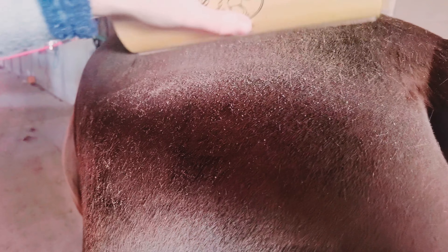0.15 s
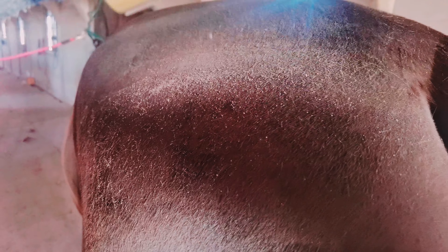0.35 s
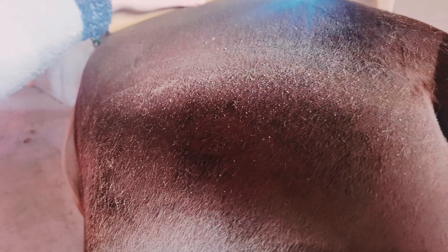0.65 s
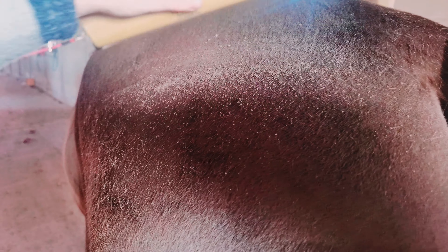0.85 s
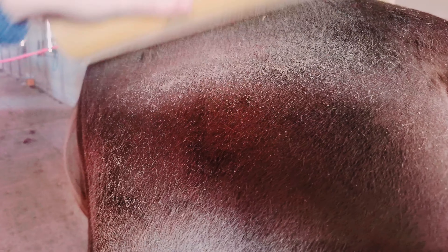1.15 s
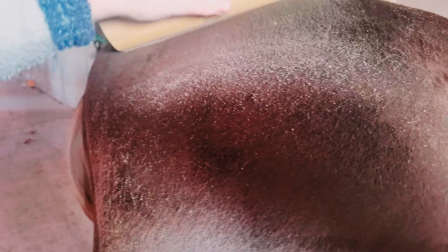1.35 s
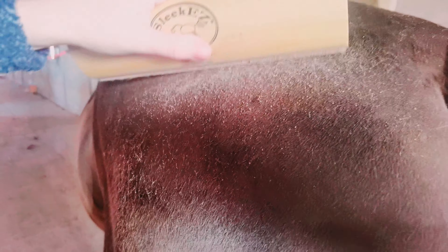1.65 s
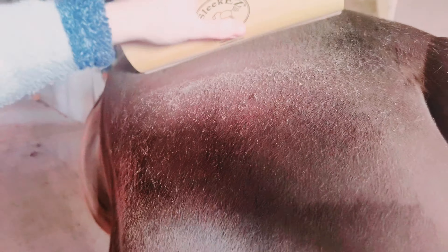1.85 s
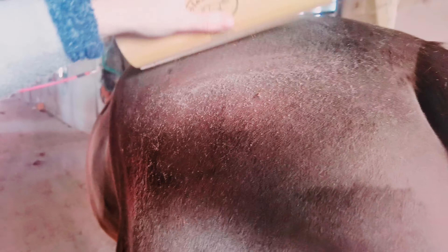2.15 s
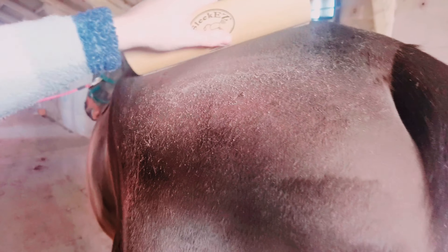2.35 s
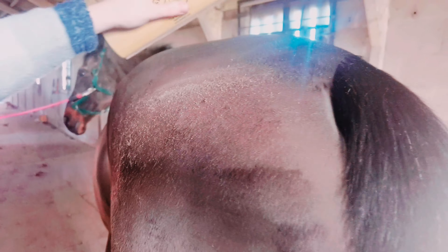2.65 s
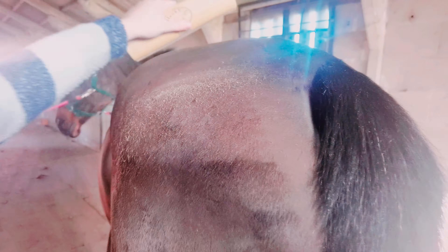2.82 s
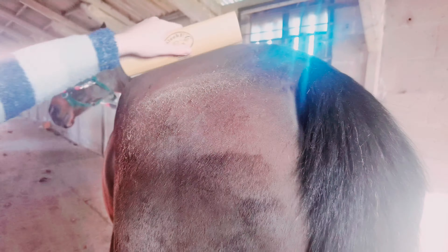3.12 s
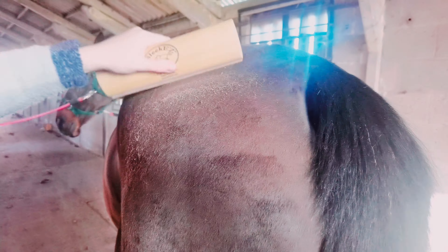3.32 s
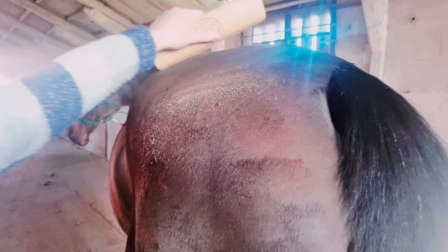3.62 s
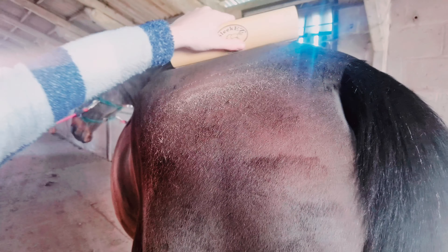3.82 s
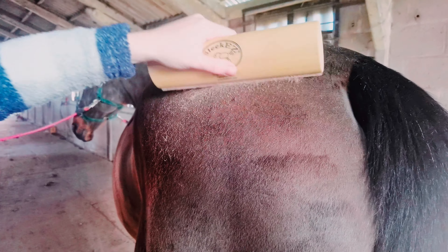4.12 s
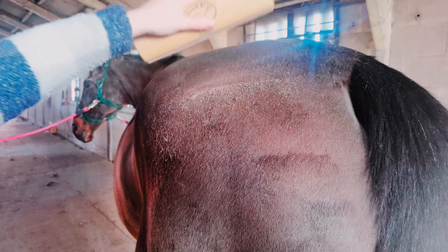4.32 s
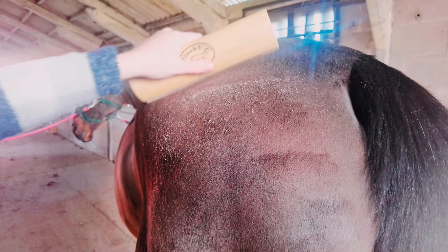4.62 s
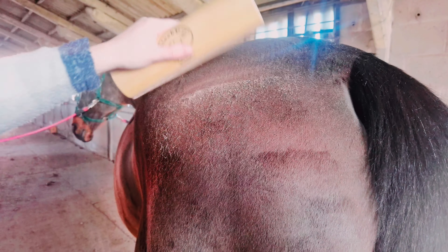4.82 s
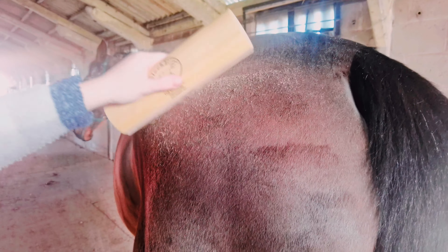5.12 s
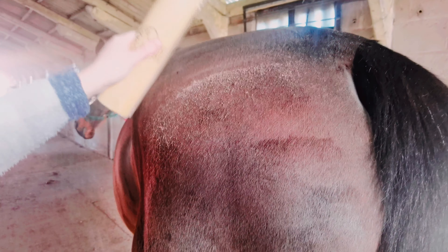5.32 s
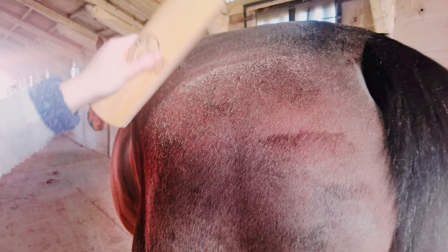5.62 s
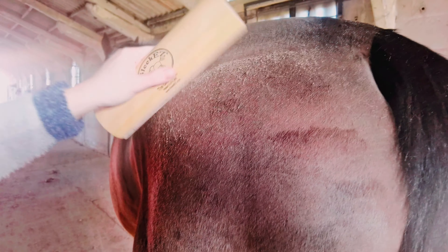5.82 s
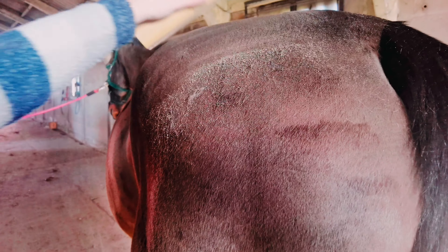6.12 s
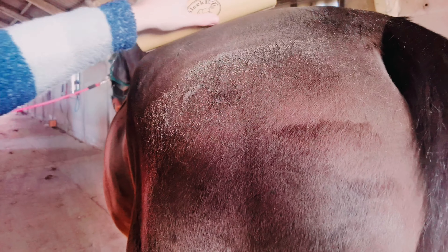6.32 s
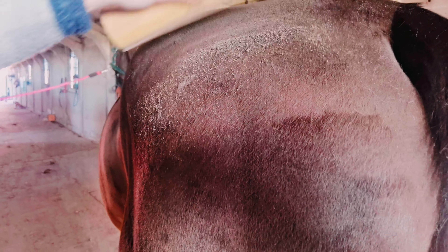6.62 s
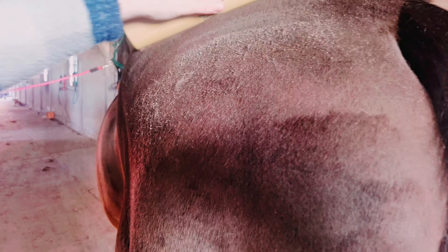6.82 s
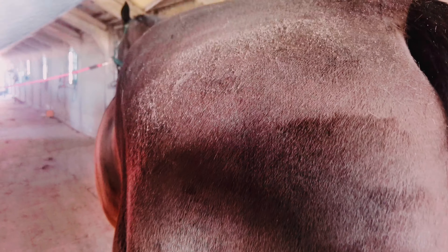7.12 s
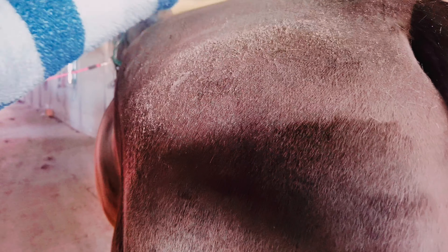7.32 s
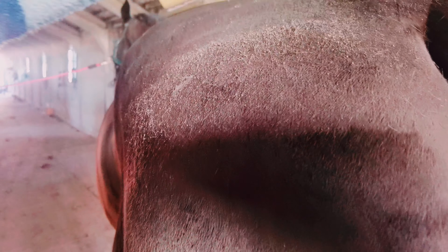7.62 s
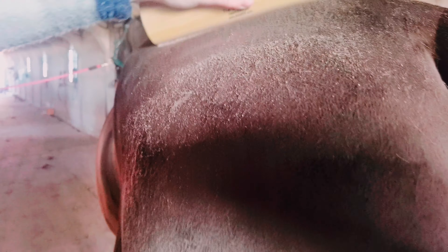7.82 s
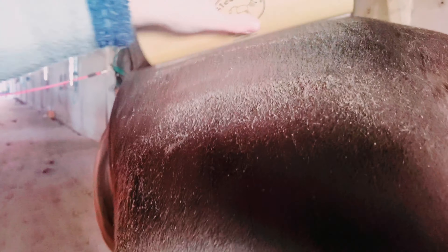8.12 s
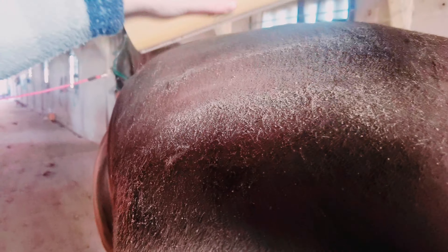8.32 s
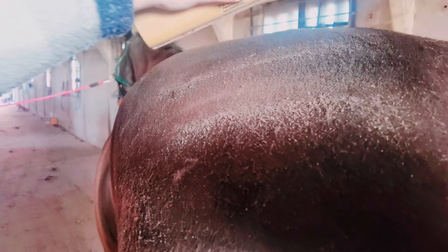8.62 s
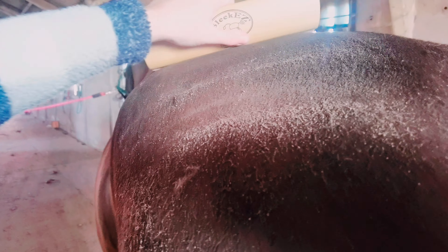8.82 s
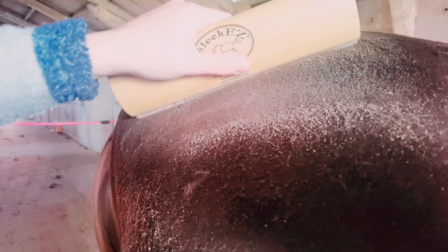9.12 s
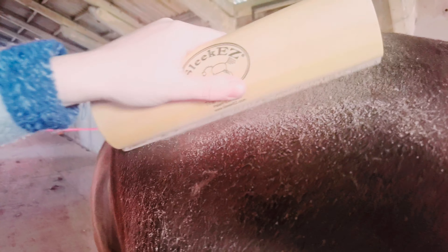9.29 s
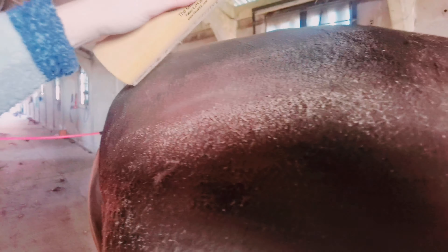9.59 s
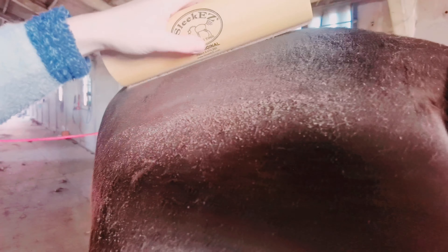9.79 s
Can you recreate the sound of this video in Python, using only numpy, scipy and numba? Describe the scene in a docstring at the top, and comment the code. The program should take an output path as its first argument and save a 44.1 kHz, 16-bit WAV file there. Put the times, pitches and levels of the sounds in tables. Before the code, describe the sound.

A toothed steel blade in a wooden handle is drawn over a horse's rump, very close to the microphone. Brief crisp rasps come roughly twice a second, some short and some longer, each swelling in pitch with the hand's speed and ending in a woody shudder. Light ticks and soft brushing fill the gaps. A short indoor echo, faint hiss and low rumble lie behind.

```python
"""A fine-toothed shedding blade in a wooden handle is drawn over a horse's rump in quick strokes, heard close by.
Dense random clicks stand for hairs flicking off the teeth; filters let them ring the blade and the handle.
The rate at which hairs catch, heard as a moving band, rises and falls with the hand's speed.
Between strokes come light grazes, soft brushing and a few dull thuds. Filtered noise adds a short echo,
a low rumble with swells, perhaps wind or handling, a murk above it and a faint hiss."""
import sys
import numpy as np
from scipy import signal
from scipy.fft import rfft, irfft, next_fast_len
from scipy.io import wavfile
from scipy.ndimage import uniform_filter1d, map_coordinates
from numba import njit

SR = 44100
rng = np.random.default_rng(int(sys.argv[2]) if len(sys.argv) > 2 else 0)


def unload_wav(signal):
    """Save mono or channel-first audio to the path in sys.argv[1] as 16-bit WAV at rate SR, clipped to [-1, 1]."""
    wavfile.write(
        sys.argv[1],
        SR,
        np.round(np.clip(np.atleast_2d(signal).T, -1, 1) * 32767).astype(np.int16),
    )


N = 438794
T = np.arange(N) / SR  # time of every sample, in seconds

# Strokes of the blade, one row each. Columns:
# start_s (of full contact), length_s (of full contact), attack_s (for a rise of 20 dB), level_db,
# lean_db (end minus start), catching_db, handle_db, hide_db (these three relative to level_db),
# drag_db (handle boost at the final drag), change_db (change of the catching from start to end of the stroke),
# ring_db (lower blade ring), width_db (stereo width of each stroke), pan_db (left minus right)
STROKES = [ (-.1, 0.093, .04, -25.5, 1, -12, -14.5, -21.5, 4.8, 2, 9, -1, 0.5),
           (0.308, 0.15, 0.047, -22.5, 1, -12.5, -22, -23, 16.5, 2.5, 7, -0.5, 0.5),
           (0.785, 0.1, 0.047, -21.5, -5.5, -14, -19, -25, 11, -2, 5, 1, 0),
           (1.361, 0.26, .024, -20, 4, -10.5, -20, -26, 1, 4, 4.5, 1, -0.4),
           (1.912, 0.16, 0.037, -21, 6, -9.5, -16.5, -27.5, 6.8, -5, 3.5, 1.5, -0.7),
           (2.589, 0.31, 0.035, -22, 7, -14, -22.5, -25.5, 12.6, 6, 5.5, -1.5, 0.5),
           (3.288, 0.16, 0.076, -22.5, 0, -14, -12.5, -28.5, 5.7, -3, 3, -0.5, 0),
           (3.829, 0.069, 0.053, -21, -6.5, -14, -15, -33, 7.4, -6, 2.5, -3, -.4),
           (4.213, 0.12, 0.039, -25, -3.5, -11, -15, -25.5, 8.6, -6.5, 4, -1.5, 0),
           (4.881, 0.28, 0.04, -25, 4.5, -15, -19.5, -26.5, 12.6, 4, 4, -2, 0),
           (5.648, .32, 0.029, -21, 2, -6.5, -16, -29, 6, 1, 2.5, 0, 0),
           (6.41, 0.17, 0.059, -25.5, 5, -14, -14.5, -28, 7.4, 2, 3, -2.5, 0.7),
           (6.887, 0.095, 0.031, -30, -0.5, -17, -14.5, -28, 5.3, 6, -1.5, -7, 0.5),
           (7.338, 0.069, 0.055, -28, -1.5, -21, -19, -26, 2, -2, 6, 0, 0.5),
           (7.654, 0.05, 0.025, -37, -2.5, -20, -21, -27.5, 8.3, 4, -4.5, -5, 0.5),
           (8.194, 0.25, 0.085, -24.5, 5.5, -12.5, -18.5, -24, 4, 4, 6, -1, -.5),
           (8.748, 0.12, 0.029, -20.5, 0, -12, -17, -26, 5, -4.5, 5, -3.5, 0.5),
           (9.318, 0.12, 0.027, -19, 3, -11.5, -17.5, -33.5, 2.2, 9, 5, -1.5, -0.5),
           (9.702, 0.063, 0.041, -20, -2, -11.5, -16, -26, 4.5, -4, 2.5, 2.5, 0)]
# Spectrum of the faint hiss, also used for brushing the coat: pitch_hz, level_db
HISS = [(500, 2), (900, -3.5), (1200, -6), (1650, -4.5), (2100, 3), (2550, -5), (3300, -4.5), (4200, -10.5),
        (5200, -1.5), (7400, 5), (8300, 9), (9300, -0.5), (11500, -15.5), (15500, -40.5)]


def grooming():
    """Strokes and grazes: the flicks ring blade and handle, and the hide scrubs underneath."""
    # light grazes of the blade: start_s, level_db, length_s, handle_db (relative to level_db)
    grazes = [(0.045, -46.5, 0.045, -35), (0.233, -48, 0.0053, -23), (0.529, -37, 0.031, -12),
              (0.71, -52, 0.01, -25), (1.77, -51, 0.0062, -26), (1.82, -53.5, 0.015, -24.5),
              (3.985, -34, 0.0089, -5), (4.137, -48.5, 0.008, -53), (5.525, -53.5, 0.083, -31),
              (6.296, -53, 0.0097, -18), (6.826, -51, 0.019, -26), (7.038, -45.5, 0.023, -17),
              (7.249, -41, 0.029, -32), (8.665, -59, 0.017, -14), (9.834, -36.5, 0.013, -13)]
    # flicking hairs on the steel blade: pitch_hz, level_db
    blade_spectrum = [(2600, -28), (3300, -19), (3900, -18.5), (4600, -8), (5050, -4), (5600, -1.8),
                      (6300, -2.5), (6750, -2), (7300, 1.5), (7750, 1.5), (8300, 5), (9000, -3),
                      (10200, -9), (11500, -20), (13500, -18.5), (15500, -25.5)]
    # resonances of the wooden handle: pitch_hz (at a catch rate of 3000 Hz), width_hz, level_db
    handle_modes = [(1742, 410, -1.5), (2003, 780, 6.5), (3170, 270, 3)]
    # scrubbing of the hide under the coat: pitch_hz, level_db
    hide_spectrum = [(120, -16), (300, -17), (500, 5.5), (800, -1), (1200, 0.5), (1700, -13), (3000, -17.5)]
    catch_rest_hz, catch_sweep_hz = 1400, 2990  # catch rate of a slow blade, and what full speed adds
    ring_speed_db = 7.5  # the blade's lower ring fades by this much as the hand stops
    graze_ring_db = -2  # that ring in a light graze

    blade_gain, catch_gain, handle_gain, hide_gain = stroke_gains()
    speed = hand_speed()
    catch_hz = catch_rest_hz + catch_sweep_hz * speed

    # the lower ring follows grip and speed, and wavers as the coat presses on the blade
    ring_db, _, _ = stroke_tone()
    ring_gain = blade_gain * undb(ring_db - ring_speed_db * (1 - speed) + 1.2 * glide(18))
    for start, db, length, handle_db in grazes:
        touch = undb(db) * swell(start, length)
        blade_gain = blade_gain + touch
        ring_gain = ring_gain + touch * undb(graze_ring_db)
        handle_gain = handle_gain + touch * undb(handle_db)

    # take the lower ring out of the blade's sound, so that it gets a level of its own
    blade_flicks = flicks(per_s=9000, spread_db=1.0, clump_db=0.42)
    steel = unit(colour(blade_flicks, blade_spectrum)) * undb(-1.87)
    ring = resonance(steel, 5380, 2000)
    blade = (steel - ring) * blade_gain + ring * ring_gain

    caught_hairs = flicks(per_s=6000, spread_db=3.5, clump_db=0.0)
    catching = unit(resonance(caught_hairs, catch_hz, 2200)) * catch_gain * undb(-3.5)

    tugs = flicks(per_s=4000, spread_db=1.0, clump_db=0.8)
    pitch = (catch_hz / 3000) ** 0.11  # slow, light contact sounds a little lower
    wood = sum(undb(db) * resonance(tugs, hz * pitch, width) for hz, width, db in handle_modes)
    handle = unit(wood) * handle_gain * undb(-2.26)

    scrubbing = flicks(per_s=4000, spread_db=0.5, clump_db=-0.8)
    hide = unit(colour(scrubbing, hide_spectrum)) * hide_gain * undb(0.5)

    judder = undb(0.78 * walk(90))  # the whole edge sticks and slips in the coat
    return judder * (blade + catching + handle + hide)


def stroke_gains():
    """Gains of blade, catching hairs, handle and hide: each stroke bites, follows the hand, drags and lifts."""
    arch_db_per_s = 18.5  # the longer a stroke, the more its middle stands above its ends
    release_s = 0.073  # time to fall 20 dB once the hand slows
    catch_arch_db = 6  # hairs catch most in mid-stroke
    handle_follow = 0.83  # the handle follows the rasp only in part (dB per dB)
    drag_lag_s, drag_s = 0.016, 0.036  # the slowing blade shakes the handle: delay, half width
    hide_arch_db = 5.5  # the hide scrubs most in mid-stroke

    gains = np.zeros((4, N))
    for (start, length, attack_s, db, lean_db, catch_db, handle_db, hide_db,
         drag_db, change_db, *_) in STROKES:
        near = (T > start - .2) & (T < start + length + .3)
        age = T[near] - start
        along = np.clip(age / length, 0, 1) - .5  # -0.5 at the start, 0.5 at the end
        ends = (2 * along) ** 2  # 0 in mid-stroke, 1 at both ends
        rise_db = 20 * np.minimum(age, 0) / attack_s
        fall_db = -20 * np.maximum(age - length, 0) / release_s
        speed_db = lean_db * along - arch_db_per_s * length * ends
        rasp_db = db + rise_db + speed_db + fall_db
        drag = np.exp(-((age - length - drag_lag_s) / drag_s) ** 2)
        gains[:, near] += undb([
            rasp_db,
            rasp_db + catch_db + change_db * along - catch_arch_db * (ends - .5),
            db + handle_db + rise_db + handle_follow * speed_db + fall_db + drag_db * drag,
            rasp_db + hide_db - hide_arch_db * ends])
    return gains


def hand_speed():
    """Speed of the hand, 0-1: half a sine wave for each stroke."""
    run_up_s, run_out_s = 0.069, 0.049  # the hand moves before full contact and after it
    speed = np.zeros(N)
    for start, length, *_ in STROKES:
        phase = (T - start + run_up_s) / (run_up_s + length + run_out_s)
        moving = (phase > 0) & (phase < 1)
        speed[moving] = np.sin(np.pi * phase[moving])
    return speed


def stroke_tone():
    """Blade ring, stereo width and balance in dB, moving from the middle of one stroke to the next."""
    rows = []
    for start, length, *_, ring_db, width_db, pan_db in STROKES:
        rows.append((start + length / 2, ring_db, width_db, pan_db))
    return curves(rows)


def flicks(per_s, spread_db, clump_db):
    """Hairs snapping off the teeth: dense clicks of unequal size that come in tufts."""
    clicks = (rng.random(N) < per_s / SR) * rng.choice([-1, 1], N)
    sizes = undb(spread_db * np.minimum(rng.exponential(size=N), 5))
    tufts = undb(clump_db * walk(450))
    return unit(clicks * sizes * tufts)


def returns():
    """Between strokes the tool slides back over the coat with a light hiss and a soft ring of the handle."""
    # light brushing on the way back: middle_s, length_s, level_db
    brushes = [(.66, 0.15, -60), (3.66, 0.28, -57), (4.6, 0.31, -60), (5.35, 0.1, -66.5),
               (6.22, 0.17, -63.5), (6.77, 0.37, -60.5), (7.55, 0.091, -64.5), (9.15, 0.58, -62),
               (9.6, 0.15, -64), (9.92, 0.23, -63)]
    # now and then the handle sings softly: middle_s, length_s, level_db
    handle_swells = [(4.6, 0.13, -65), (9.08, 0.2, -70)]
    coat = ambience(HISS, side_db=-3.5) * np.sqrt(humps(brushes)) * undb(0.5 * walk(25))
    ring = unit(resonance(rng.standard_normal(N), 2080, 250))  # centre and width in Hz
    return coat + ring * np.sqrt(humps(handle_swells))


def thuds():
    """Soft, low bumps of band-passed noise, perhaps the horse shifting its weight."""
    # start_s, level_db, length_s, pitch_hz (middle of a wide band)
    bump_table = [(0.566, -50.5, 0.046, 230), (3.939, -52.5, 0.12, 156), (5.93, -45, 0.12, 215)]
    bumps = 0
    for start, db, length, hz in bump_table:
        noise = unit(resonance(rng.standard_normal(N), hz, hz))
        bumps = bumps + undb(db) * swell(start, length) * noise
    return colour(bumps, [(380, 1.0), (550, -8.5), (1000, -17.0)])  # dull above a few hundred hertz


def space(x):
    """The horse's back colours the rasp, a delayed, coloured side signal widens it, the walls answer later."""
    # spectrum of the side signal: pitch_hz, level_db (side minus middle, before each stroke's width)
    side_spectrum = [(300, -11.5), (700, -21.5), (1400, -10.5), (2300, -5.5), (3500, 5), (4600, -4),
                     (5500, -7), (6400, 3), (7200, -15.5), (8800, -8), (12000, -0.5)]
    # the tool sounds different at left and right: pitch_hz, level_db (left minus right)
    balance = [(700, 1), (1300, 0), (1850, -5.5), (2700, 0.5), (3500, 0), (4600, 5.5), (5600, 2),
               (6500, 0.5), (8200, -1), (10000, 2.5), (13000, 3.5)]
    # how far the left side's phase runs ahead: pitch_hz, lead_radians
    left_lead = [(0, 0), (1600, 1.08), (2100, 1.56), (2800, 1.5), (3400, -3.34), (4200, 0.84), (4650, 4),
                 (5500, 5.5), (7000, 2 * np.pi)]
    _, width_db, pan_db = stroke_tone()

    back = .55  # strength of the reflections off the horse's back
    reflected = bounces(x, first_ms=0.715, last_ms=1.9, slide_ms=0.21, count=2)
    mid = (x + back * reflected) / np.hypot(1, back)
    delayed = bounces(x, first_ms=1.211, last_ms=4.5, slide_ms=.15, count=3)
    side = colour(delayed, side_spectrum) * undb(width_db)

    # each side takes half of the difference in level
    left = colour(mid + side, [(hz, db / 2) for hz, db in balance])
    left = lead(left, left_lead) * undb(pan_db / 2)
    right = colour(mid - side, [(hz, -db / 2) for hz, db in balance]) * undb(-pan_db / 2)

    walls = np.array([signal.fftconvolve(x, tail(t60=0.47, delay_s=0.0082))[:N] for _ in range(2)])
    wall_spectrum = [(300, -18.5), (2100, -14.5), (4000, -11.5), (8000, -22), (12000, -38)]
    return np.array([left, right]) + colour(walls, wall_spectrum)


def bounces(x, first_ms, last_ms, slide_ms, count):
    """Short delayed copies whose delays lengthen and shorten at random, so that their peaks sweep."""
    out = 0
    for k, path_ms in enumerate(np.linspace(first_ms, last_ms, count)):
        lag = np.abs(path_ms + slide_ms * glide(6)) * SR / 1000  # in samples
        delayed = map_coordinates(x, [np.arange(N) - lag], order=3)
        out = out + (-1) ** k * delayed
    return out / np.sqrt(count)


def tail(t60, delay_s):
    """A decaying spray of reflections with unit energy; t60 is the seconds to fall 60 dB."""
    t = T[:SR]
    spray = rng.standard_normal(SR) * undb(-60 * t / t60) * (t >= delay_s)
    return spray / np.linalg.norm(spray)


def background():
    """Three filtered noises: a low rumble with swells, perhaps wind or handling, a murk and a faint hiss."""
    # spectra of rumble and murk: pitch_hz, level_db
    rumble_spectrum = [(20, -20.5), (32, -9), (50, -3.5), (72, 0.5), (100, -8), (150, -11.5), (300, -67)]
    murk_spectrum = [(60, -10), (120, 1.5), (170, 0), (250, -5), (400, -15), (700, -29), (1300, -54),
                     (3000, -52.5)]
    # swells of the low rumble: middle_s, length_s, level_db
    rumble_swells = [(1.38, 0.22, -54), (2.62, 0.4, -57), (4.1, 0.67, -54.5), (5.95, .7, -49.5),
                     (6.58, 0.32, -43.5), (6.98, 0.52, -43), (7.6, 0.23, -46), (8.28, 0.21, -45.5),
                     (8.55, 0.36, -44.5), (9.1, 0.36, -50.5), (9.95, 0.47, -60)]
    # level of the low murk: time_s, level_db
    murk_level = [(0, -63), (1.7, -59.5), (3.1, -56), (4.1, -53), (4.6, -59), (6.3, -54.5), (6.6, -51.5),
                  (7.4, -55.5), (9.95, -52)]
    rumble_db, hiss_db = -59, -67  # steady levels

    murk_db, = curves(murk_level)
    rumble_power = undb(rumble_db) ** 2 + humps(rumble_swells)
    rumble = ambience(rumble_spectrum, side_db=-16) * np.sqrt(rumble_power)
    murk = ambience(murk_spectrum, side_db=-11.5) * undb(murk_db + 2 * walk(19))
    hiss = ambience(HISS, side_db=-3.5) * undb(hiss_db + 1.2 * walk(15))
    return rumble + murk + hiss


def ambience(points, side_db):
    """Stereo noise of a given spectrum: a shared middle plus a side that is opposite at left and right."""
    mid, side = unit(colour(rng.standard_normal((2, N)), points))
    return mid + undb(side_db) * np.array([side, -side])


def undb(db):
    """Decibels to gain."""
    return 10 ** (np.asarray(db) / 20)


def unit(x):
    """Scale to rms 1."""
    return x / np.sqrt(np.mean(x ** 2))


def curves(table):
    """Every column of a table of (time_s, ..) rows, drawn as straight lines sample by sample."""
    s, *columns = np.transpose(table)
    return [np.interp(T, s, c) for c in columns]


def swell(start, length):
    """A quick rise to 1 at half the length, and a smooth fall."""
    age = np.clip((T - start) / length, 0, 20) * 2
    return age * np.exp(1 - age)


def humps(table):
    """Power of smooth swells given as (middle_s, length_s, level_db) rows."""
    return sum(undb(db) ** 2 * np.exp(-(2 * (T - middle) / length) ** 2) for middle, length, db in table)


def walk(rate):
    """A random level that changes about rate times a second; spread 1."""
    return unit(np.interp(T * rate, np.arange(8192), rng.standard_normal(8192)))


def glide(rate):
    """A smooth random motion: a walk averaged over one of its steps; spread 1."""
    return unit(uniform_filter1d(walk(rate), int(SR / rate)))


def colour(x, points):
    """Filter by a spectrum of (pitch_hz, level_db) points, leaving the phase alone."""
    hz, db = np.transpose(points)
    size = next_fast_len(N + 4096)  # spare room, so that the end does not wrap onto the start
    f = np.maximum(np.fft.rfftfreq(size, 1 / SR), 1)
    gain = undb(np.interp(np.log(f), np.log(hz), db))
    return irfft(rfft(x, size) * gain, size)[..., :N]


def lead(x, points):
    """Advance the phase by a curve of (pitch_hz, lead_radians) points."""
    hz, radians = np.transpose(points)
    size = next_fast_len(N + 4096)
    phase = np.interp(np.fft.rfftfreq(size, 1 / SR), hz, radians)
    return irfft(rfft(x, size) * np.exp(1j * phase), size)[:N]


@njit
def svf(x, hz, width):
    """State-variable band-pass whose centre and width may move."""
    y, b, l = np.empty(len(x)), 0., 0.  # output, and the memories of its band and low parts
    for i in range(len(x)):
        g, k = np.tan(np.pi * hz[i] / SR), width[i] / hz[i]
        v = (b + g * (x[i] - l)) / (1 + g * (g + k))
        b, l, y[i] = 2 * v - b, l + 2 * g * v, k * v
    return y


def resonance(x, hz, width):
    """A band-pass applied twice, for steep skirts."""
    hz, width = hz * np.ones(N), width * np.ones(N)
    return svf(svf(x, hz, width), hz, width)


def scene():
    """The tool at work, with the echo and noises around it."""
    return space(grooming()) + background() + returns() + thuds()


def record(dry):
    """A steep low-pass cuts the top above 15800 Hz."""
    low_pass = signal.ellip(10, .2, 80, 15800, fs=SR, output="sos")
    return signal.sosfilt(low_pass, dry)


dry = scene()
out = record(dry)
unload_wav(out)
```